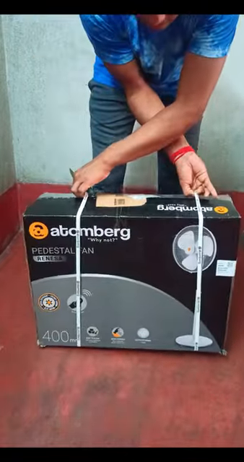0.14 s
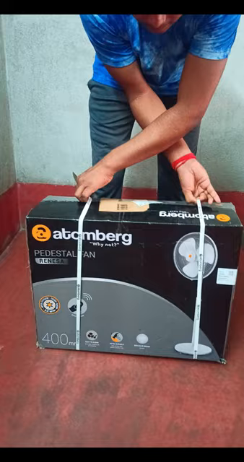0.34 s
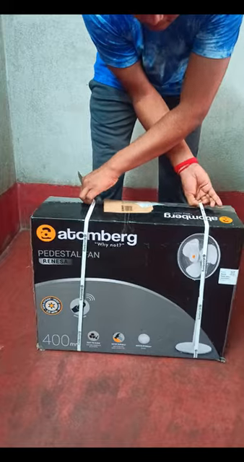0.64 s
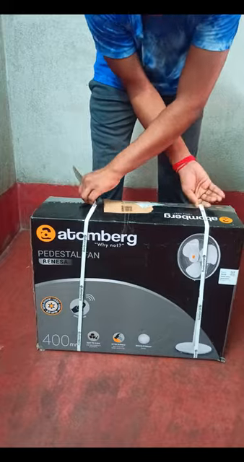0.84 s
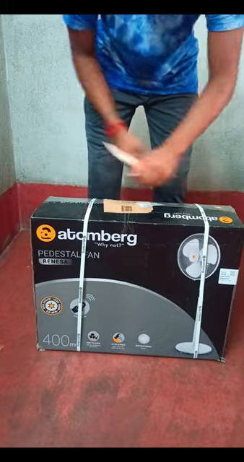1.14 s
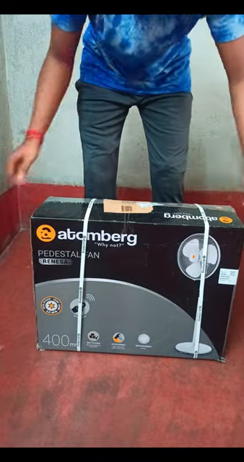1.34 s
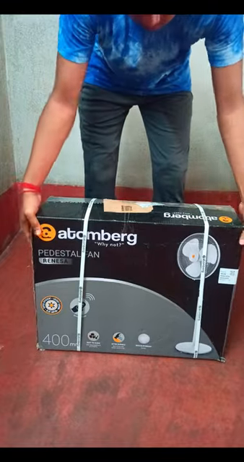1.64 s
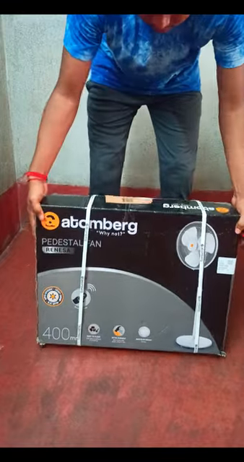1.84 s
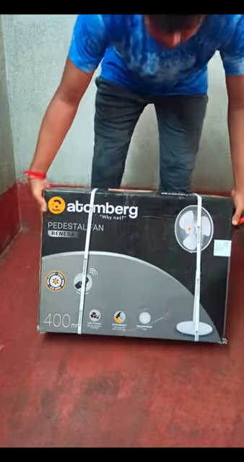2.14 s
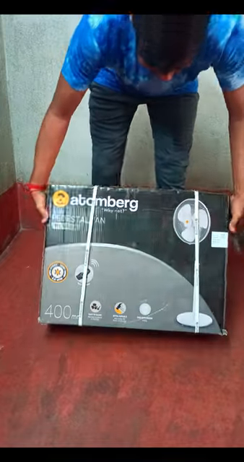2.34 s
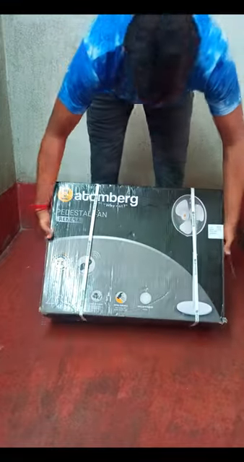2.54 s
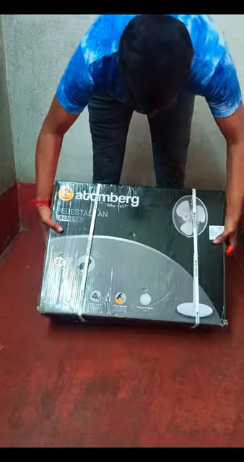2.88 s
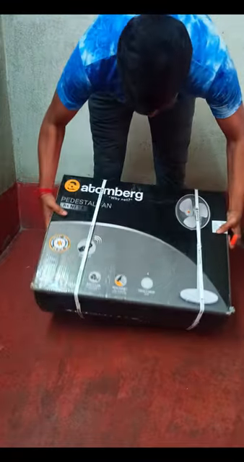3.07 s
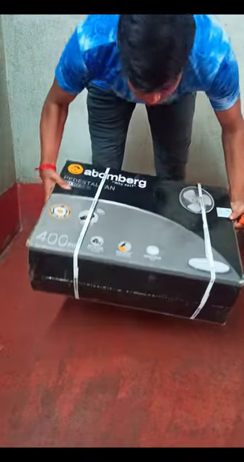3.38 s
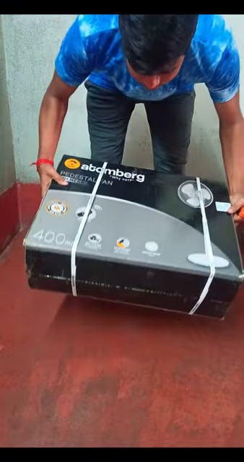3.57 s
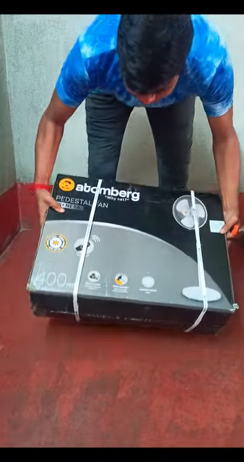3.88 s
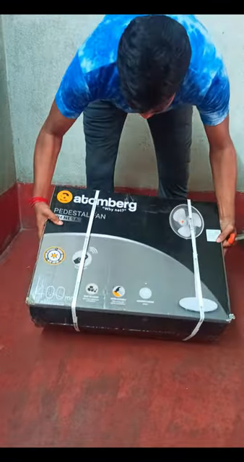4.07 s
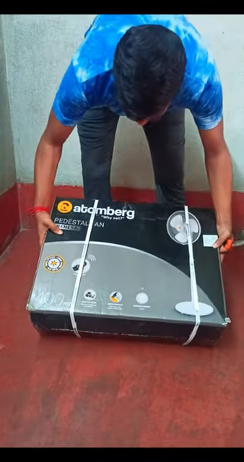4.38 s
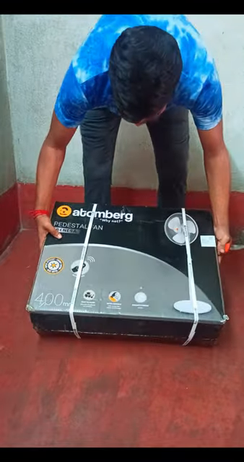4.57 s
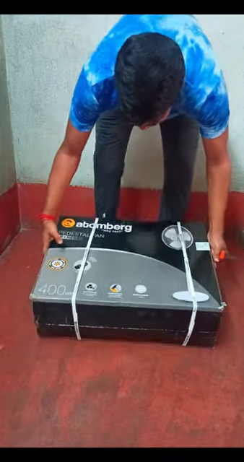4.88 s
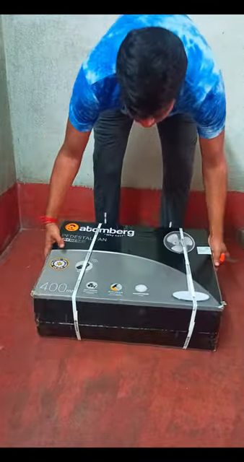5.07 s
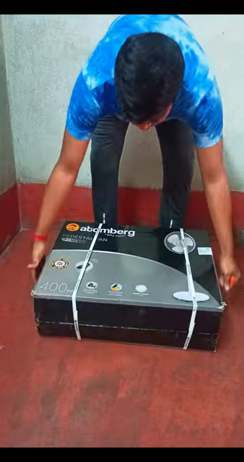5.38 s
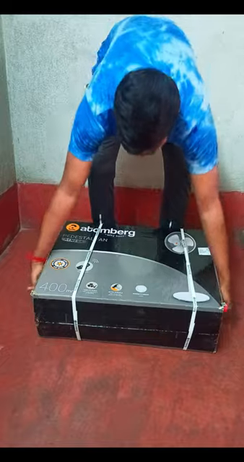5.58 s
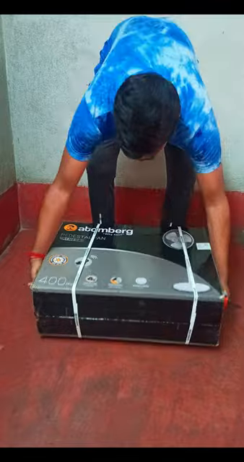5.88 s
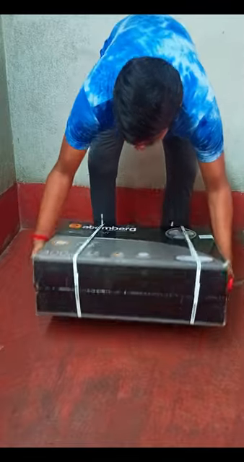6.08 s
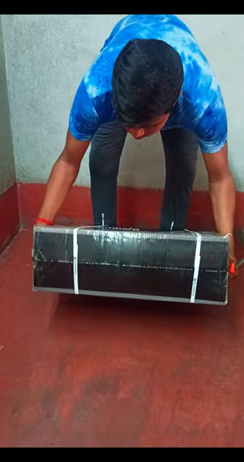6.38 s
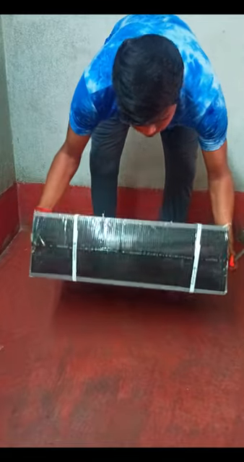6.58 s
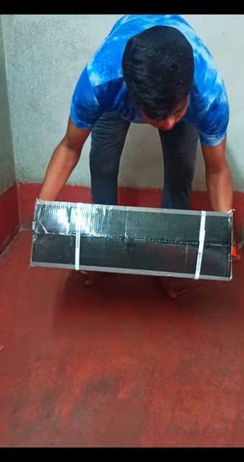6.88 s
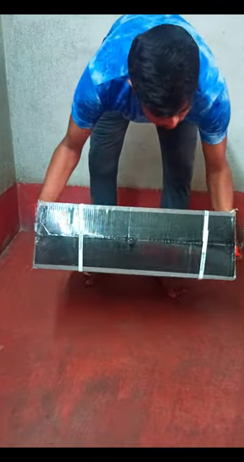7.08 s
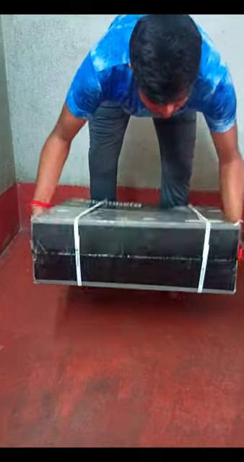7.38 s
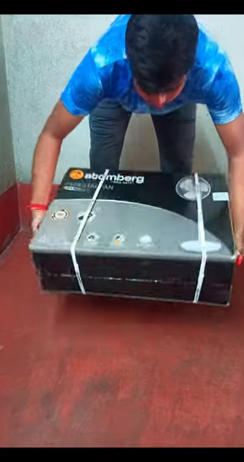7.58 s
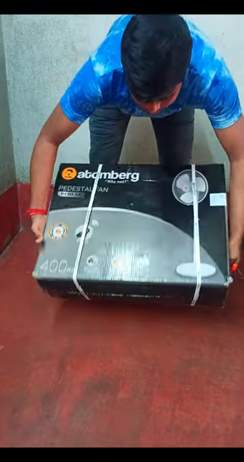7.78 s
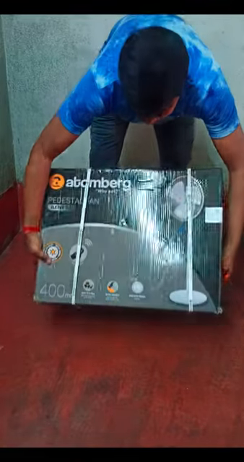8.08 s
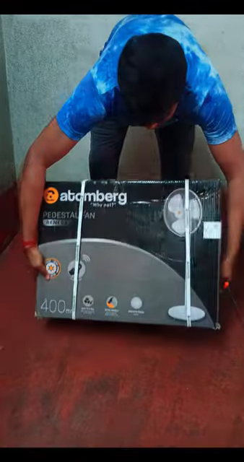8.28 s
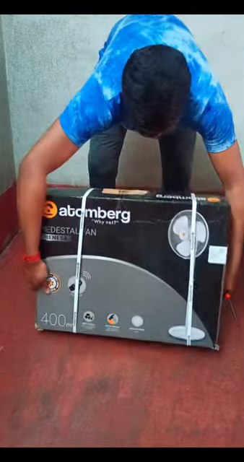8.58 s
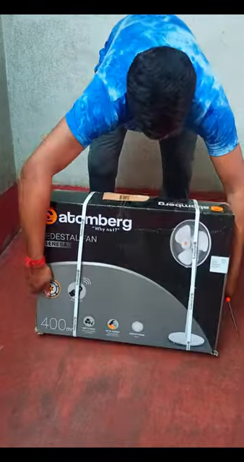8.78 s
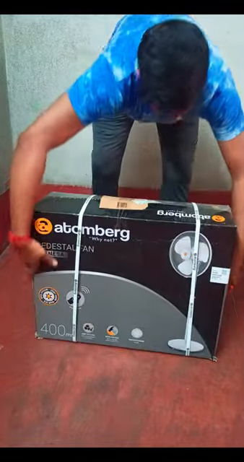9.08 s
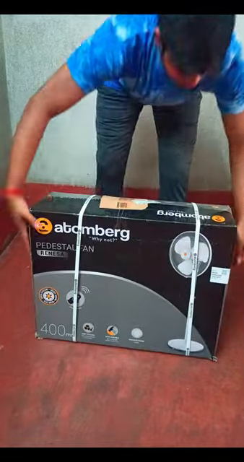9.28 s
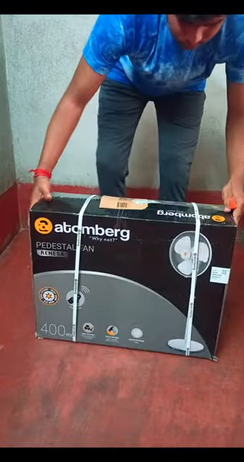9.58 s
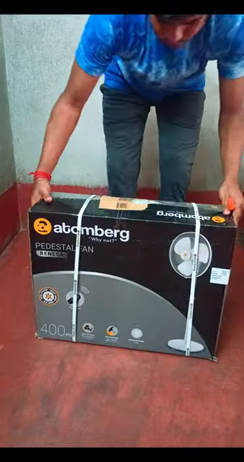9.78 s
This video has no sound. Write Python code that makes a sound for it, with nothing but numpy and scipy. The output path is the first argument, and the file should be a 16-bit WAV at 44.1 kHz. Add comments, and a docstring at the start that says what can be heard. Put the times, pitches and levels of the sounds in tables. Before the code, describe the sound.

A large strapped cardboard carton is gripped, scraped and tipped on a hard floor in a small bare room, with crackles, snaps and hollow thumps.

```python
"""Heavy carton handled in a bare room

A heavy strapped carton is gripped, tipped over, lifted and stood up again on the hard floor of a small room.
Palms and edges rub over the board as filtered random slips; creases and straps snap as dying runs of fractures.
Each landing slaps the board, rings decaying modes of the carton and the room and sets the packing chattering.
Dense, changing echoes answer the blows, snaps and crackle; the same signal goes to both channels."""
import sys
import numpy as np
from scipy import signal
from scipy.fft import rfft, irfft
from scipy.io import wavfile
from scipy.ndimage import uniform_filter1d

SR = 44100
rng = np.random.default_rng(int(sys.argv[2]) if len(sys.argv) > 2 else 0)


def digitize_waveform(pressure):
    """Quantize a signal to 16-bit integers and store it at the path in sys.argv[1].

    Rows of a 2-D input are taken as channels; values are limited to [-1, 1].
    """
    field = np.atleast_2d(pressure).T
    bounded = np.clip(field, -1, 1)
    quanta = np.round(bounded * 32767).astype(np.int16)
    wavfile.write(sys.argv[1], SR, quanta)


N = 437913
TIME = np.arange(N) / SR

# spectrum of snapping board and of fibres catching: f/Hz, level/dB
SNAP_SPECTRUM = [(150, -18.5), (550, 0.5), (850, -7), (1250, -6), (1700, 2.5), (2100, -1), (2500, -1),
                 (3300, 1), (4400, -2.5), (5200, 1.5), (6200, -4.5), (7500, -0.5), (10600, -16),
                 (13000, -10)]


def undb(db):
    """Decibels to gain."""
    return 10 ** (np.asarray(db) / 20)


def unit(x):
    """Scale to rms 1."""
    return x / np.sqrt(np.mean(x ** 2))


def at_hz(points, hz):
    """Read (Hz, value) points on a log-frequency axis."""
    f, value = np.transpose(points)
    return np.interp(np.log(np.maximum(hz, 1)), np.log(f), value)


def colour(x, points, tilt=0, size=4096):
    """Causal minimum-phase filter with the given spectrum, tilted in dB per octave."""
    hz = np.maximum(np.arange(size // 2 + 1) * SR / size, 1)
    level_db = at_hz(points, hz) + tilt * np.log2(hz / np.mean(hz))
    cepstrum = irfft(np.log(undb(level_db)))
    # folding the cepstrum forward puts the energy as early as possible
    cepstrum[1:size // 2] *= 2
    cepstrum[size // 2 + 1:] = 0
    impulse = irfft(np.exp(rfft(cepstrum)))
    return signal.fftconvolve(x, impulse)[:len(x)]


def walk(rate):
    """Smooth random wander with a spread near 1, drawing `rate` new points per second."""
    return np.interp(TIME * rate, np.arange(SR), rng.standard_normal(SR))


def grains(rate, spread_db):
    """Tiny slips at random moments, `rate` per second on average, of unequal size."""
    size = undb(spread_db * np.clip(rng.standard_normal(N), -2, 2))
    sign = rng.choice([-1, 1], N)
    return size * sign * (rng.random(N) < rate / SR)


def add(track, s, sound, db):
    """Mix in a short sound; its level is its energy spread over a hundredth of a second."""
    start = int(s * SR)
    sound = sound * undb(db) * np.sqrt(SR / 100 / np.sum(sound ** 2))
    track[start:start + len(sound)] += sound[:N - start]


def wall_tail(build_s, diffuse_hz, size=16384):
    """One dense set of wall echoes, each band dying at its own rate, evened to unit energy before the bass cut."""
    # decay of the room: f/Hz, t60/s
    room_decay = [(200, 0.66), (530, 0.36), (1400, 0.34), (3700, 0.32), (9700, 0.25), (15000, 0.13)]
    t, hz = TIME[:size], np.arange(size // 2 + 1) * SR / size
    noise, tail = rfft(rng.standard_normal(size)), 0
    centres, t60s = np.transpose(room_decay)
    # each row of the identity gives one band, crossfading into its neighbours
    for t60, share in zip(t60s, np.eye(len(t60s))):
        band = irfft(noise * np.interp(hz, centres, share))
        tail = tail + band * np.exp(-np.log(1000) * t / t60)
    tail = rfft(tail * (1 - np.exp(-(t / build_s) ** 2)))
    # the many paths even out the response
    tail /= np.sqrt(uniform_filter1d(np.abs(tail) ** 2, size=24))
    # the room is too small for a dense field in the bass
    return irfft(tail * hz ** 2 / np.hypot(hz ** 2, diffuse_hz ** 2))


def room(x, wet_db, build_s, diffuse_hz, size=4096):
    """Direct sound plus echoes whose paths keep changing as the carton and the body move."""
    wet, fade = np.zeros(N + SR), np.sin(np.pi * np.arange(size) / size)
    # each overlapping slice of sound meets a fresh set of echoes
    for i in range(0, N, size // 2):
        piece = x[i:i + size] * fade[:N - i]
        echoes = signal.fftconvolve(piece, wall_tail(build_s, diffuse_hz))
        wet[i:i + len(echoes)] += echoes
    return x + undb(wet_db) * wet[:N]


def still_air(level_db):
    """Faint still air: steady noise, heaviest in the low bass."""
    # spectrum of the air: f/Hz, level/dB
    air_spectrum = [(25, -19.5), (60, -7), (105, 4), (200, -4), (400, -1.5), (1000, -15), (3000, -21),
                    (7300, -24), (10500, -31.5), (16000, -30.5)]
    return undb(level_db) * unit(colour(rng.standard_normal(N), air_spectrum))


def stroke_gains():
    """Gains of hiss, crackle and rumble: every slide swells, sags while it lasts, then dies away, the rumble last."""
    # slides of a hand or an edge, in order: working at the straps; gripping, dragging back and tipping over;
    # laying flat and sliding to a new grip; lifting and turning in the air; standing up and letting go.
    # start/s, rise/s, hold/s, board hiss/dB, board crackle/dB, panel rumble/dB (before the layer trims)
    strokes = [ (0.017, 0.024, .06, -86, -72, -62), (0.166, 0.046, 0.032, -55, -50.5, -56.5),
               (0.36, 0.036, 0.12, -47.5, -49.5, -57), (0.517, 0.037, 0.031, -40, -43, -45.5),
               (0.757, 0.026, .09, -64, -65, -66), (0.884, 0.059, 0.023, -62, -63, -52.5),
               (0.99, 0.053, .02, -61.5, -62.5, -55), (1.623, 0.071, .03, -78, -82, -72),
               (1.679, 0.14, 0.095, -54, -55, -47.5), (1.919, 0.033, 0.038, -40, -38.5, -44.5),
               (2.057, .01, 0.15, -41.5, -51.5, -52), (2.2, 0.025, 0.017, -33, -39.5, -43),
               (2.321, 0.087, 0.11, -46.5, -61, -52), (2.431, 0.15, 0.14, -38.5, -44.5, -57),
               (2.73, 0.066, 0.22, -46.5, -49, -53.5), (3.122, 0.041, .03, -60.5, -59.5, -61),
               (3.216, .035, 0.13, -56, -56.5, -58.5), (3.585, 0.024, .04, -67.5, -68.5, -63.5),
               (3.678, 0.045, .09, -79, -71.5, -67), (3.834, 0.044, 0.015, -59.5, -57.5, -58.5),
               (4, 0.056, 0.25, -86, -86.5, -77), (4.301, 0.027, 0.22, -63, -60.5, -58),
               (4.462, 0.17, 0.077, -39, -52, -48), (4.724, .04, 0.096, -51.5, -62, -54),
               (4.856, 0.097, 0.015, -36.5, -44.5, -45.5), (4.969, 0.033, 0.12, -45.5, -45.5, -43),
               (5.173, 0.036, 0.11, -64.5, -65, -60), (5.364, .08, .06, -63.5, -71, -63.5),
               (5.457, 0.25, 0.073, -46.5, -66, -43.5), (5.594, 0.087, 0.098, -53.5, -59, -55.5),
               (5.805, 0.037, 0.042, -36.5, -42.5, -43.5), (5.993, 0.03, 0.067, -46.5, -48, -47.5),
               (6.182, 0.13, 0.077, -59.5, -59.5, -58), (6.588, 0.026, 0.19, -72.5, -74.5, -67.5),
               (6.764, 0.1, 0.15, -67.5, -69, -66.5), (7.04, .05, 0.06, -78, -74, -71),
               (7.16, .1, 0.045, -82, -75, -71.5), (7.296, 0.062, 0.046, -68.5, -72, -71),
               (7.458, 0.037, 0.19, -76, -73, -67.5), (7.604, .18, 0.15, -52, -55.5, -52),
               (7.917, 0.088, 0.026, -50.5, -51, -50.5), (8.08, .1, 0.17, -54.5, -55.5, -53.5),
               (8.38, 0.038, 0.052, -59, -63, -53.5), (8.488, 0.027, 0.1, -57.5, -58, -59.5),
               (8.586, 0.13, 0.12, -54.5, -52.5, -52.5), (8.897, 0.057, 0.26, -44, -52.5, -54),
               (9.292, 0.093, 0.03, -51, -60, -56), (9.47, 0.045, 0.12, -66, -71, -69),
               (9.577, 0.024, 0.084, -65, -57.5, -57), (9.652, 0.089, 0.023, -43, -50, -54.5),
               (9.79, 0.028, .03, -62, -48, -49), (9.873, 0.021, 0.045, -38, -50, -47)]
    t, power = TIME[::50], 0
    sag_db_per_s = 2  # a slide loses speed as it goes on
    release_db_per_s = np.array([[165], [182], [110]])  # hiss, crackle, rumble
    for start, rise, hold, *layer_db in strokes:
        swell = np.sin(np.pi / 2 * np.clip((t - start) / rise, 0, 1)) ** 2
        held = np.maximum(t - start - rise, 0)
        fall_db = sag_db_per_s * held + release_db_per_s * np.maximum(held - hold, 0)
        gain = swell * undb(np.array(layer_db)[:, None] - fall_db)
        power = power + gain ** 2
    return [np.interp(TIME, t, np.sqrt(p)) for p in power]


def rubbing(hiss_db, crackle_db, tick_db, rumble_db, judder_db):
    """Skin and floor slide over the board: fine slips hiss, coarse ones crackle, and the drag shakes the panels."""
    # how hard the carton's edge bears on the floor: t/s, boom relative to the drag/dB
    edge_load = [(0, -13), (1.5, -11), (1.8, -10), (2.5, -4.5), (2.85, -1.5), (3.4, -4.5), (4.0, -5.5),
                 (4.4, 6.5), (5.0, -6.5), (5.55, 2.5), (6.7, -12), (7.4, -10), (7.9, -11.5), (8.7, -4),
                 (9.93, -6.5)]
    # spectrum of fine slips: f/Hz, level/dB
    hiss_spectrum = [(300, -37), (1200, -11.5), (2500, -10), (3600, -7), (5200, -6), (6100, -3.5),
                     (7300, 0), (8500, -4), (10000, -12.5), (10900, -14), (13000, -6.5), (16000, -9)]
    # spectrum of coarse slips over creased board: f/Hz, level/dB
    crease_spectrum = [(250, -6.5), (700, 6.5), (1200, -2.5), (1700, 2.5), (2200, -7), (3200, -2),
                       (4300, -10.5), (6000, -1), (10000, -15.5), (16000, -35.5)]
    # spectrum of the panels shaken by the drag: f/Hz, level/dB
    rumble_spectrum = [(40, -32), (80, -22), (107, 3.5), (140, -2.5), (190, -0.5), (250, 0), (450, -6),
                       (720, -11), (1100, -20.5), (2500, -40.5)]
    # spectrum of the boom under the bearing edge: f/Hz, level/dB
    boom_spectrum = [(25, -32.5), (40, -28.5), (50, -13), (62, -18.5), (75, 6), (85, -10), (103, -0.5),
                     (125, -7.5), (160, -11.5), (400, -53)]

    hiss, crackle, rumble = stroke_gains()
    load = undb(np.interp(TIME, *np.transpose(edge_load)))
    judder = undb(judder_db * walk(70))  # the grip catches and lets go

    fine = unit(colour(grains(rate=11000, spread_db=2) * judder, hiss_spectrum))
    coarse = unit(colour(grains(rate=900, spread_db=6.0) * judder, crease_spectrum))
    ticks = unit(colour(grains(rate=130, spread_db=5), SNAP_SPECTRUM))  # fibres and grit catch on the edges
    drag = unit(colour(grains(rate=900, spread_db=2) * judder, rumble_spectrum))
    boom = unit(colour(rng.standard_normal(N), boom_spectrum, size=16384))

    sliding = fine * hiss * undb(hiss_db) + (drag + boom * load) * rumble * undb(rumble_db)
    crackling = (coarse + undb(tick_db) * ticks) * crackle * undb(crackle_db)
    return sliding, crackling


def snaps(rough_db, ring_db, ring_q):
    """A crease gives way in a quick, dying run of tiny fractures that ring the stiff patch of board or strap around it."""
    # snaps of creases and straps: t/s, level/dB (before the room), decay length/s, ring f/Hz
    snap_events = [(0.213, -52.5, 0.0049, 2500), (.268, -50, 0.0037, 3400), (0.375, -47, 0.0008, 3730),
                   (0.406, -44, 0.021, 2380), (.547, -36, 0.022, 2550), (0.943, -57, 0.012, 3860),
                   (1.74, -62, 0.0021, 2600), (1.79, -45, .004, 7550), (1.881, -47.5, 0.0025, 2480),
                   (1.924, -42, 0.0079, 4700), (1.939, -29, 0.0016, 3520), (2.069, -32.5, 0.002, 3600),
                   (2.075, -42, 0.0012, 7640), (2.22, -36.5, 0.0025, 5660), (2.961, -43.5, 0.012, 1710),
                   (3.145, -60.5, 0.0018, 3000), (3.243, -51.5, .02, 3800), (3.598, -67, 0.0052, 1510),
                   (3.868, -56.5, 0.0022, 3500), (3.889, -55, .002, 2880), (4.071, -71, .002, 6500),
                   (4.477, -55.5, .003, 3630), (4.507, -48.5, 0.0028, 1990), (4.545, -39.5, 0.0017, 3640),
                   (4.569, -33.5, 0.0075, 5500), (5.113, -45.5, 0.0032, 1900), (5.837, -35, .014, 4360),
                   (5.866, -35.5, 0.002, 3830), (6.007, -43, 0.011, 3220), (6.072, -48.5, 0.0026, 3400),
                   (6.295, -54.5, 0.0012, 6500), (6.356, -56, 0.0018, 4000), (6.401, -50.5, .0014, 9100),
                   (6.623, -58.5, 0.0011, 8500), (7.471, -70.5, 0.0035, 2800), (7.514, -69.5, 0.0036, 1800),
                   (8.326, -48, 0.0017, 3220), (8.506, -46, 0.0015, 5030), (8.73, -49.5, .003, 5000),
                   (8.79, -50.5, 0.0033, 3270), (8.917, -44.5, 0.012, 4480), (8.948, -45, 0.0019, 3200),
                   (9.041, -44, 0.0029, 3930), (9.741, -40, 0.0011, 4130), (9.754, -43.5, 0.014, 3650),
                   (9.889, -40, 0.0014, 6240)]
    out, t = np.zeros(N), TIME[:SR // 5]
    for s, db, length, ring_hz in snap_events:
        # smaller, stiffer patches snap brighter: 3 dB per octave of tilt for each octave above 3820 Hz
        tilt = 3 * np.log2(ring_hz / 3820)
        sign, size = rng.standard_normal((2, len(t)))
        fractures = np.sign(sign) * undb(rough_db * np.clip(size, -2, 2))
        run = fractures * np.exp(-t / max(length, 1 / SR))
        ring = signal.lfilter(*signal.iirpeak(ring_hz, ring_q, fs=SR), run)
        add(out, s, colour(run + undb(ring_db) * ring, SNAP_SPECTRUM, tilt), db)
    return out


def knocks(slap_db, rattle_db, rattle_s, bass_hz, scatter_db, contact_damping, lowest_hz):
    """A blow slaps the board and rings the carton's and the room's modes, most near the springy contact's
    pitch; the packing chatters inside."""
    # blows on the carton: t/s, level/dB (before bass cut and room), contact f/Hz, weight in the bass/dB
    blow_events = [(0.026, -48, 242, 5), (.177, -48.5, 365, -16), (.197, -52, 1000, -15),
                   (.213, -46, 820, 4), (0.44, -39.5, 322, -19), (.547, -43, 606, 8),
                   (0.936, -48, 600, -15), (1.741, -33, 560, -0.5), (1.794, -34, 486, 7.5),
                   (1.94, -37, 510, -5.5), (2.578, -24, 510, -20.5), (2.604, -26.5, 520, -10),
                   (2.649, -31, 422, 7.5), (2.672, -27.5, 65.4, 7), (2.764, -38, 70, 3),
                   (3.607, -51.5, 310, 4), (4.319, -31, 247, 4), (4.336, -41, 470, -11),
                   (4.412, -31, 112, 6), (4.558, -21, 270, 7), (4.574, -35.5, 555, -16),
                   (5.04, -40, 332, 4.5), (5.166, -33.5, 258, 10), (5.226, -49, 110, 7.5),
                   (5.692, -23, 555, 7), (5.705, -24.5, 427, 0), (6.009, -40, 300, 12),
                   (8.361, -45, 265, 7), (8.515, -48.5, 760, -6), (8.785, -46, 450, -3),
                   (9.296, -40, 530, 8), (9.323, -43, 220, 6), (9.593, -39.5, 440, -11),
                   (9.734, -37.5, 197, -14), (9.89, -43, 594, -8), (9.91, -38.5, 500, -19)]
    # what the room and the loaded carton ring with (the lowest modes are the room's), before each blow's
    # variation: f/Hz, level/dB, t60/s
    ring_modes = [(52, -13.5, 0.58), (73.5, -6, 0.98), (101.56, 0, 0.97), (109.95, 4, 0.62),
                  (122, -17, .4), (167.5, -15, 0.49), (192.3, -9.5, 0.59), (244, 1.5, 0.14),
                  (318.5, -1, 0.091), (362, -5, 0.17), (431, -3, 0.17), (543, -2, 0.12), (626, -4.5, 0.12),
                  (770, 8, .06), (842, 6, 0.038), (1040, -12.5, 0.036), (1400, -1, .03), (1670, 2, .04)]
    # slap of a flat panel on the floor, for a contact pitch of slap_hz: f/Hz, level/dB
    slap_spectrum = [(60, -32.5), (200, 3), (450, 8.5), (750, -2), (1100, -15.5), (1800, -11.5),
                     (2400, -26), (5000, -51.5), (12000, -72.5)]
    slap_hz = 590

    out, t = np.zeros(N), TIME[:SR]
    hz, mode_db, t60 = np.transpose(ring_modes)
    decay = np.exp(-np.log(1000) * t / t60[:, None])
    for s, db, contact_hz, weight_db in blow_events:
        scatter = scatter_db * rng.standard_normal(len(hz))
        weight = weight_db / (1 + (hz / bass_hz) ** 4)
        # the springy contact drives the modes as a damped resonance
        drive = 1 / np.hypot(1 - (hz / contact_hz) ** 2, contact_damping * hz / contact_hz)
        gain = undb(mode_db + scatter + weight) * drive
        pitch = hz * (1 + 0.014 * rng.standard_normal(len(hz)))  # each blow meets slightly shifted pitches
        ring = gain @ (np.cos(2 * np.pi * pitch[:, None] * t) * decay)
        ring *= 1 - np.exp(-(t * contact_hz * 2) ** 2)  # lower contact pitch, slower onset

        contact = [(f * contact_hz / slap_hz, level) for f, level in slap_spectrum]  # softer contact, lower slap
        slap = colour(signal.unit_impulse(SR), contact)
        chatter = colour(rng.standard_normal(SR) * np.exp(-t / rattle_s), contact)
        blow = unit(ring) + undb(slap_db) * unit(slap) + undb(rattle_db) * unit(chatter)
        add(out, s, blow, db)
    # a box this small radiates little deep bass
    return signal.sosfilt(signal.butter(6, lowest_hz, "high", fs=SR, output="sos"), out)


def scene():
    """Mix still air, sliding, snaps and blows; echoes surround the crackle, snaps and blows."""
    air = still_air(level_db=-77.5)
    sliding, crackle = rubbing(hiss_db=-1, crackle_db=-6.5, tick_db=-2.5, rumble_db=0.5, judder_db=1.3)
    creases = snaps(rough_db=0.5, ring_db=0.5, ring_q=2.2)
    blows = knocks(slap_db=-7.0, rattle_db=-1.5, rattle_s=0.027, bass_hz=151, scatter_db=2,
                   contact_damping=0.45, lowest_hz=54)
    sharp = room(crackle + creases, wet_db=0.0, build_s=0.0049, diffuse_hz=300)
    # the broad panels face the microphone, so their thumps arrive more directly
    dull = room(blows, wet_db=-1, build_s=0.0089, diffuse_hz=282)
    return np.tile(sharp + dull + sliding + air, (2, 1))


def record(dry):
    """The recorder cuts the top with a steep low-pass at 15850 Hz."""
    top_cut = signal.ellip(10, .2, 70, 15850, fs=SR, output="sos")
    return signal.sosfilt(top_cut, dry)


dry = scene()
out = record(dry)
digitize_waveform(out)
```